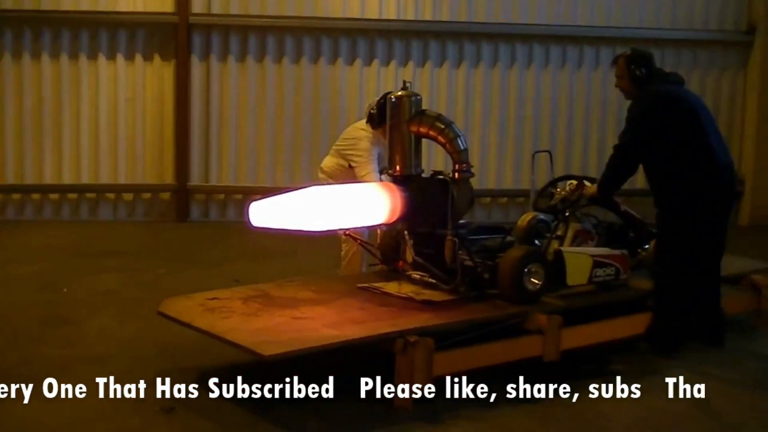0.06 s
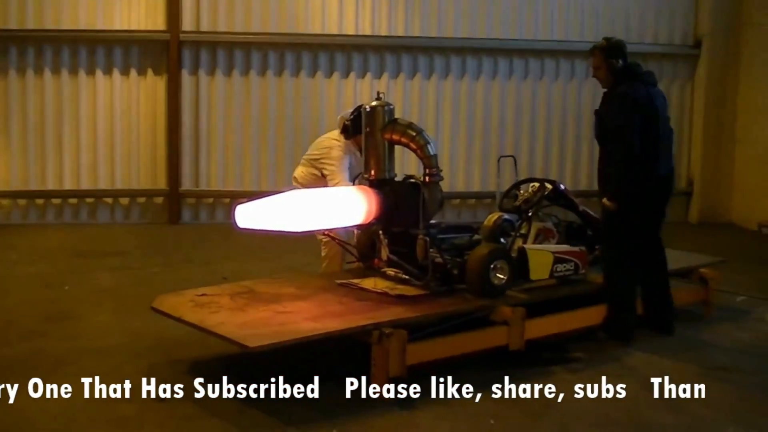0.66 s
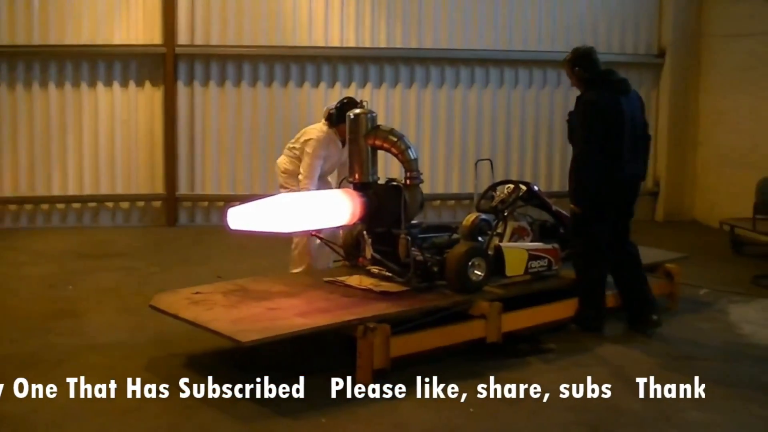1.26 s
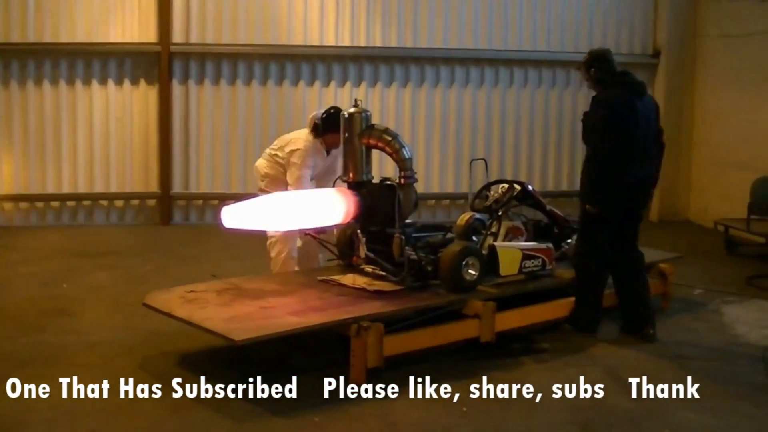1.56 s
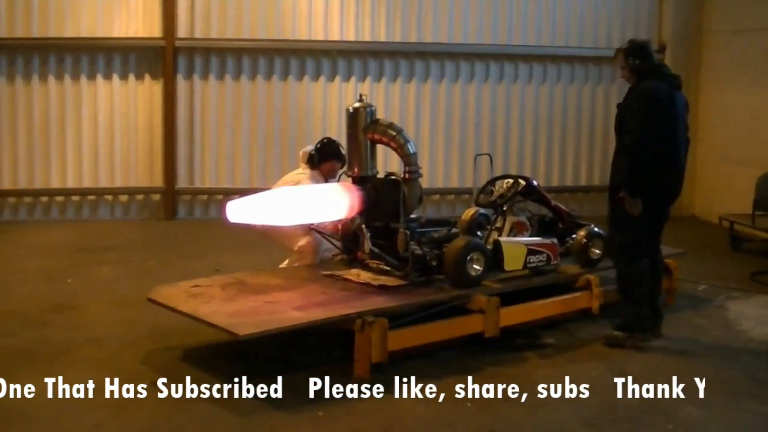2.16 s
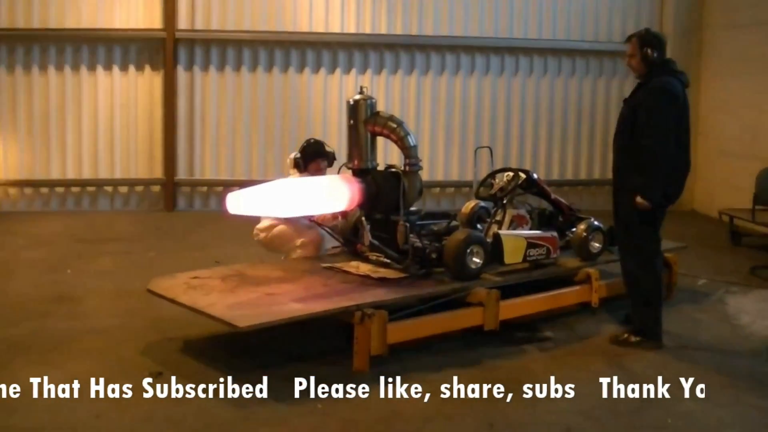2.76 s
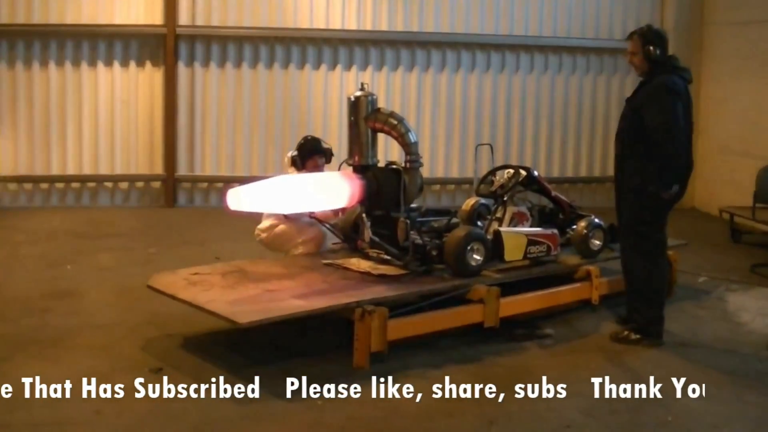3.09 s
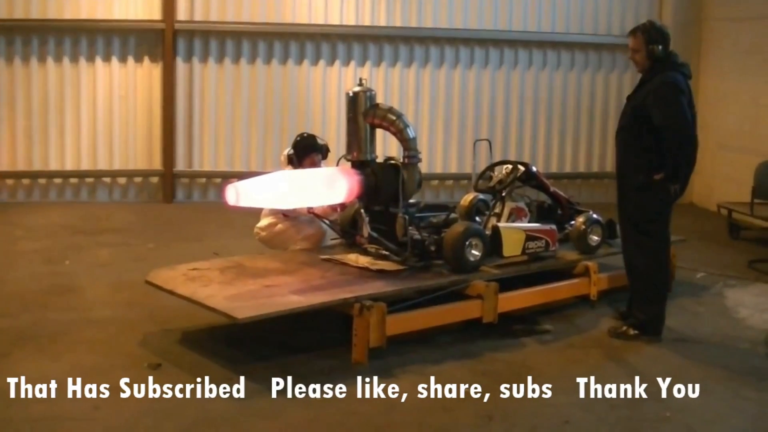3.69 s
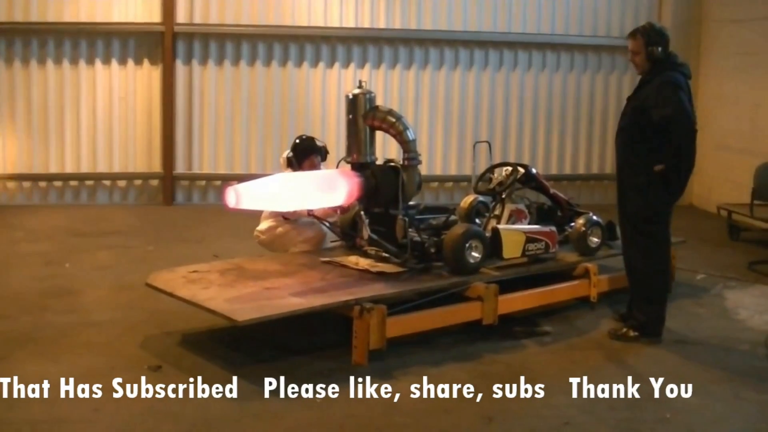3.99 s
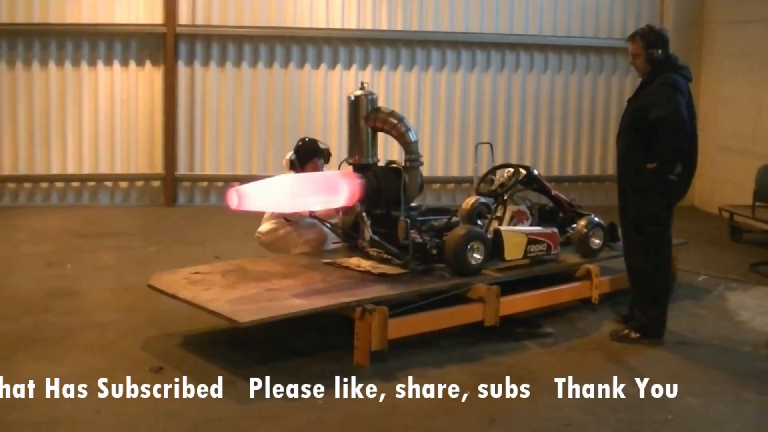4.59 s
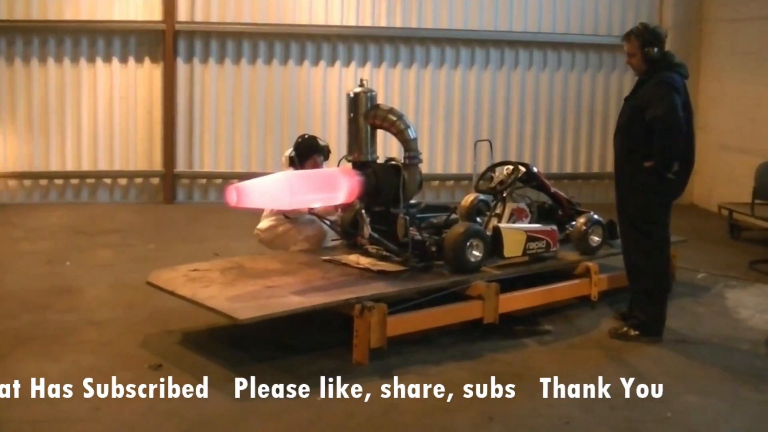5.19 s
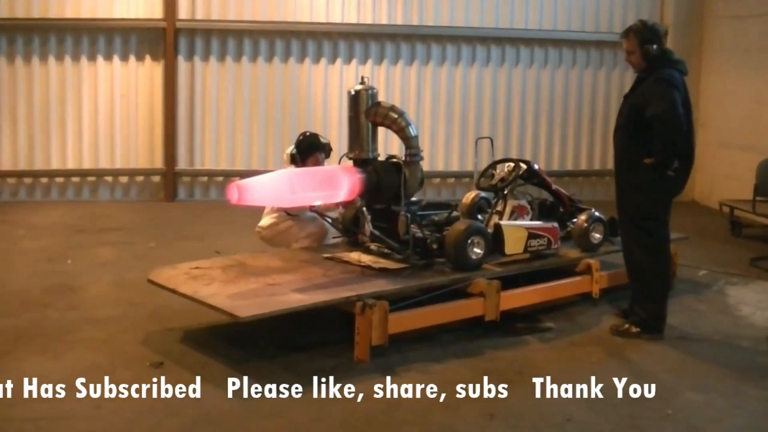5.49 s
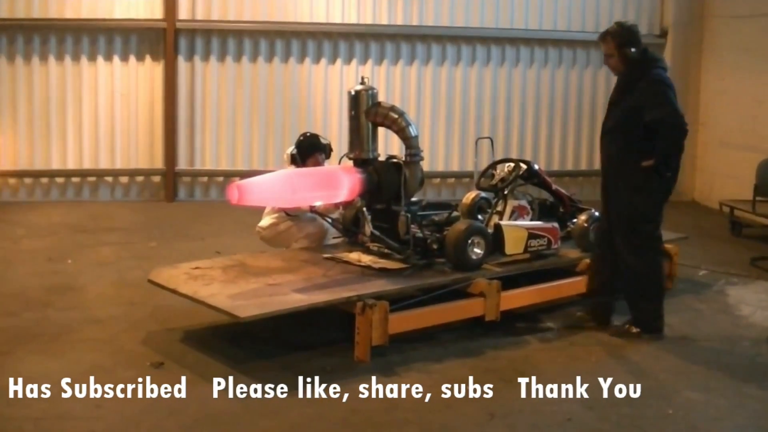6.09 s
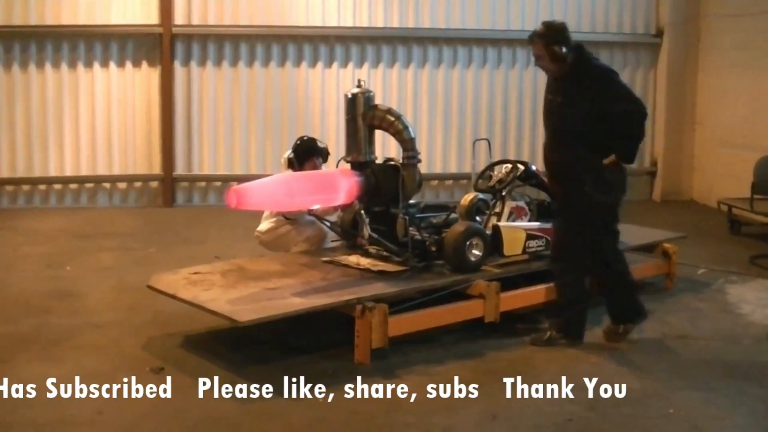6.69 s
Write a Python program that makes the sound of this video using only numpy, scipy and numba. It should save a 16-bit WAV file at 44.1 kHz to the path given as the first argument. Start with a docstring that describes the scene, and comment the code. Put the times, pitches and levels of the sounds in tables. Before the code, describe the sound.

A homemade jet engine runs flat out for about seven seconds, a few metres away in a sheet-metal shed with a short, slight echo. A piercing, very high turbine whistle sits over a rough, fluttering howl from the jet pipe, a thin screech and a steady rushing exhaust roar. A faint mid-pitched rotor hum lies underneath. The whistle swells and dips irregularly, loudest in the first half second and again just after 2 seconds. The howl grows from about 1.5 seconds and stands out most around 3.5 seconds, when the whistle recedes. At about 4.5 seconds the whistle comes back and holds more evenly, easing slightly at the very end. The pitch sinks only a little throughout, and the engine never stops. The microphone is slightly overloaded, adding a fine fizz, and the roar ducks under the strongest whistle peaks.

```python
"""In a sheet-metal shed, a homemade turbocharger jet engine runs flat out a few metres away.
Compressor blades chop the intake air into a whistle that swells and fades among the shed's standing waves
as the humming shaft slowly loses speed. Flow-driven resonances of the hot jet pipe howl and screech over
the broadband roar of the turbulent exhaust. The microphone's gain control ducks the roar under the
whistle, and its overloaded input adds sum and difference tones."""
import sys
import numpy as np
from scipy import signal
from scipy.fft import rfft, irfft, next_fast_len
from scipy.io import wavfile
from scipy.ndimage import uniform_filter1d
from numba import njit

SR = 44100
rng = np.random.default_rng(int(sys.argv[2]) if len(sys.argv) > 2 else 0)


def master(y):
    """Save y as 16-bit WAV."""
    cut = np.clip(np.atleast_2d(y).T, -1, 1)
    pcm = np.round(cut * 32767)  # scale
    wavfile.write(sys.argv[1], SR, pcm.astype(np.int16))


N = 302085

# Rotation rate of the shaft: time_s, speed_hz
SHAFT_SPEED = [(0, 896.3), (0.35, 893.0), (1.2, 888.3), (2.2, 885.3), (3.1, 881.7), (3.9, 880.2),
               (4.4, 880.4), (5.3, 877.2), (6.85, 875.6)]
# Whistle at the microphone's place in the standing waves: time_s, level_db
WHISTLE_LEVEL = [(0.0, -4), (0.12, -17.5), (0.18, -3), (0.29, -10.5), (0.34, -5.5), (0.62, -10.5),
                 (0.82, -7.5), (1.0, -17.5), (1.14, -8.5), (1.26, -19.5), (1.3, -13.5), (1.82, -10.5),
                 (1.84, -22.5), (2.12, -4), (2.22, -14), (2.4, -7.0), (2.46, -13), (2.56, -9.5), (2.6, -28),
                 (2.64, -10), (2.74, -25.5), (2.76, -13), (3.22, -11.0), (3.54, -30), (3.76, -13.5),
                 (3.84, -24.5), (4.26, -18.5), (4.3, -29.5), (4.5, -9.5), (4.86, -9), (5.01, -21),
                 (5.06, -12.5), (5.98, -9), (6.02, -13), (6.74, -12.5), (6.85, -18.0)]

def blade_whistle(blades=8, waver_db=1.7, rough_db=-23, scatter_db=-28):
    """Blade-passing tone: each blade chops the intake air, so pitch is blade count times shaft speed."""
    speed_hz, = curves(SHAFT_SPEED)
    level_db, = curves(WHISTLE_LEVEL)
    level_db += waver_db * flutter(width_hz=29, edge_hz=14).real  # moving hot air
    ragged_inflow = 1 + undb(rough_db) * flutter(width_hz=750, edge_hz=1200)
    wall_scatter = undb(scatter_db) * flutter(width_hz=71, edge_hz=770)
    return np.sqrt(2) * tone(undb(level_db) * ragged_inflow + wall_scatter, blades * speed_hz)


# Strength of the jet pipe's howl: time_s, relative_level_db
HOWL_LEVEL = [(0.0, -22), (0.16, -14), (0.2, -21.5), (0.26, -12), (0.42, -20.5), (1.48, -14), (2.22, -15),
              (3.38, -12), (3.4, -13), (5.7, -15.0), (6.0, -19.5), (6.85, -15.5)]
# Upper resonances of the pipe: pitch_hz, width_hz, relative_level_db
SCREECH_MODES = [(9735, 100, 0.5), (10030, 290, -6), (13650, 150, -14), (14700, 300, -17.5)]

def jet_pipe(howl_hz=4884, howl_sag_hz_per_s=3.5, wander_hz=18, howl_trim_db=-1.6, throb_db=2.5,
             screech_db=-22.5, surge_db=1.76, fade_db_per_s=0.3):
    """Flow-excited resonance: a slowly sinking howl, and a slightly fading screech about steady pitches."""
    t = np.arange(N) / SR
    pitch_hz = howl_hz - howl_sag_hz_per_s * t  # the howl sinks as the pipe cools
    level_db, = curves(HOWL_LEVEL)
    swing = flutter(width_hz=39.5, edge_hz=170)
    swing /= np.sqrt(1 + 0.27 * np.abs(swing) ** 2)  # saturation
    # fed steadily by the flow, the howl flutters fast but never stays away for long
    swing /= np.sqrt(uniform_filter1d(np.abs(swing) ** 2, size=3000))
    # hot and cool pockets of gas pull all resonances up and down together
    detune_hz = wander_hz * flutter(width_hz=69, edge_hz=112.6).real
    howl = tone(swing, pitch_hz + detune_hz) * undb(throb_db * flutter(width_hz=53, edge_hz=29).real)
    stretch = 1 + detune_hz / pitch_hz
    screech = sum(undb(db) * tone(flutter(width_hz, edge_hz=640), hz * stretch)
                  for hz, width_hz, db in SCREECH_MODES)
    screech *= undb(surge_db * flutter(width_hz=41, edge_hz=53).real - fade_db_per_s * t)
    return howl / howl.std() * undb(level_db + howl_trim_db) + screech / screech.std() * undb(screech_db)


# Spectrum of the jet's turbulence: frequency_hz, relative_density_db
JET_SPECTRUM = [(30, -19), (120, -18), (180, -11), (330, -5), (560, 0), (1100, 0.6), (1900, 2),
                (3000, -1.5), (3900, -3.5), (5600, -2), (8500, -10.5), (11300, -18), (13000, -34),
                (15600, -30)]
# Broad resonances of flame tube and ducts: centre_hz, width_hz, lift_db
DUCT_RESONANCES = [(372, 46, 5), (523, 170, 2.5), (660, 53, 2.5), (825, 160, 4.5), (1475, 255, 4.5),
                   (1694, 150, 3.5), (2210, 300, 2.5), (2540, 230, 1), (3060, 600, 3.5), (4610, 590, 5),
                   (5420, 300, 3), (6170, 92, 3)]
# Deep part of the combustion roar: time_s, relative_level_db
ROAR_LEVEL = [(0.0, -26), (0.09, -21), (0.19, -26.5), (0.95, -22), (2.1, -23), (2.96, -22.5), (3.12, -25),
              (3.5, -21.5), (3.85, -21), (4.4, -22.5), (4.6, -23), (6.6, -22.5), (6.85, -22.5)]

def exhaust(split_hz=1150, roar_trim_db=-2.0, rush_db=-19.0, rush_follows=0.17, churn_db=1.5):
    """Source and filter: ducts colour the jet's turbulence, a deep roar and a fine rush that both churn."""
    size = next_fast_len(N)
    bin_hz = np.fft.rfftfreq(size, 1 / SR) + 1
    jet_hz, jet_db = np.transpose(JET_SPECTRUM)
    colour_db = np.interp(np.log(bin_hz), np.log(jet_hz), jet_db)
    for centre_hz, width_hz, lift_db in DUCT_RESONANCES:
        colour_db += lift_db * .5 ** ((2 * (bin_hz - centre_hz) / width_hz) ** 2)
    low_share = 1 / (1 + (bin_hz / split_hz) ** 8)
    roar_db, = curves(ROAR_LEVEL)
    swell_db = rush_follows * (roar_db - roar_db.mean())
    out = np.zeros(N)
    for share, level_db in ((low_share, roar_db + roar_trim_db), (1 - low_share, rush_db + swell_db)):
        spectrum = rfft(rng.standard_normal(size)) * undb(colour_db) * np.sqrt(share)
        gas = irfft(spectrum, size)[:N]
        out += gas / gas.std() * undb(level_db + churn_db * flutter(width_hz=22, edge_hz=26).real)
    return out


# Hum of the unbalanced rotor, relative levels: time_s, once_a_turn_db, twice_a_turn_db
UNBALANCE_HUM = [(0, -29.5, -47), (1.0, -34.5, -38), (1.85, -30, -33), (2.4, -32, -25), (2.9, -31, -39),
                 (3.6, -48, -33), (4.7, -42, -38), (6.0, -35, -35), (6.6, -27, -34)]
# Faint higher tones of the rotor: shaft_multiple, level_db
ROTOR_HARMONICS = [(3, -38.5), (7, -42), (9, -42.5), (16, -37)]

def rotor_hum(hum_trim_db=-1.0):
    """Rotating unbalance: a force that repeats every turn radiates harmonics of the shaft speed."""
    speed_hz, = curves(SHAFT_SPEED)
    out = np.zeros(N)
    for multiple, level_db in enumerate(curves(UNBALANCE_HUM), 1):
        waver = 0.89 + 0.18 * flutter(width_hz=12, edge_hz=27)
        out += tone(undb(level_db + hum_trim_db) * waver, multiple * speed_hz)
    for multiple, level_db in ROTOR_HARMONICS:
        waver = 0.79 + 0.74 * flutter(width_hz=7.9, edge_hz=30)
        out += tone(undb(level_db) * waver, multiple * speed_hz)
    return np.sqrt(2) * out


def shed(x, echo_db=-16, t60_s=0.25, first_echo_s=0.005):
    """Reverberation: dense reflections from floor and metal walls interfere and ripple the spectrum."""
    t = np.arange(int(.4 * SR)) / SR
    echoes = rng.standard_normal(len(t)) * undb(-60 * t / t60_s) * (t > first_echo_s)
    echoes *= undb(echo_db) / np.sqrt(np.sum(echoes ** 2))
    return x + signal.fftconvolve(x, echoes)[:N]


def flutter(width_hz, edge_hz):
    """Randomly driven resonance: its complex envelope, rms 1, with steeper skirts beyond the edge."""
    size = next_fast_len(N)
    hz = np.fft.fftfreq(size, 1 / SR)
    push = rng.standard_normal(size) + 1j * rng.standard_normal(size)
    envelope = np.fft.ifft(push / (1 + 2j * hz / width_hz) / (1 + 1j * hz / edge_hz))[:N]
    return envelope / np.sqrt(np.mean(np.abs(envelope) ** 2))


def tone(envelope, hz):
    """Modulation: a complex envelope rides on a carrier of moving frequency."""
    return (envelope * np.exp(1j * phase_of(hz))).real


def phase_of(hz):
    """Phase is the running integral of frequency."""
    return 2 * np.pi * np.cumsum(hz) / SR


def curves(table):
    """Linear interpolation of each column over time, at every sample."""
    time_s, *columns = np.transpose(table)
    return [np.interp(np.arange(N) / SR, time_s, column) for column in columns]


def undb(db):
    """Decibels to amplitude ratio."""
    return 10 ** (np.asarray(db) / 20)


def scene():
    """Superposition: the engine's sources add at one microphone, the same in both channels."""
    engine = shed(exhaust()) + jet_pipe() + blade_whistle() + rotor_hum()
    return np.array([engine, engine])


@njit
def follow_peaks(rectified, level, attack, release):
    """Envelope detection: the level jumps up with the peaks and sinks back slowly."""
    out = np.empty(len(rectified))
    for i in range(len(rectified)):
        level += (rectified[i] - level) * (attack if rectified[i] > level else release)
        out[i] = level
    return out


def gain_control(x, reference=0.64, ratio=1.65, attack_s=0.0012, release_s=0.025, lead_samples=64):
    """Look-ahead compression: peaks turn the gain down a moment before they arrive."""
    ahead = np.pad(np.abs(x[0]), (0, lead_samples), mode="reflect")[lead_samples:]
    peak = follow_peaks(ahead, ahead[:lead_samples].max(), 1 / (attack_s * SR), 1 / (release_s * SR))
    return x * (peak / reference) ** (1 / ratio - 1)


def record(dry, lopsided=0.044, ripple_hz=3900, ripple_db=-17, overtone_db=-27, jitter_db=-21,
           mellow_hz=11800, ceiling=0.92, top_hz=15700):
    """Distortion in a hard-driven microphone: compression, intermodulation, jitter and a limited band."""
    x = gain_control(dry)
    # overload bends one half of the wave more: sum and difference tones of whistle and howl
    x = x + lopsided * (x ** 2 - np.mean(x ** 2))
    # unsteady timing acts on steep slopes: ripple sets side tones around the whistle, jitter adds fizz
    ripple = phase_of(np.full(N, ripple_hz))
    slip_samples = undb(ripple_db) * np.sin(ripple) + undb(overtone_db) * np.sin(2 * ripple)
    slip_samples += undb(jitter_db) * rng.standard_normal(N)
    x = x + slip_samples * np.diff(x, prepend=0)
    x = signal.sosfilt(signal.butter(2, mellow_hz, fs=SR, output="sos"), x)
    x = x / (1 + (x / ceiling) ** 14) ** (1 / 14)  # rounds the peaks
    return signal.sosfilt(signal.ellip(14, .05, 80, top_hz, fs=SR, output="sos"), x)


dry = scene()
out = record(dry)
master(out)
```